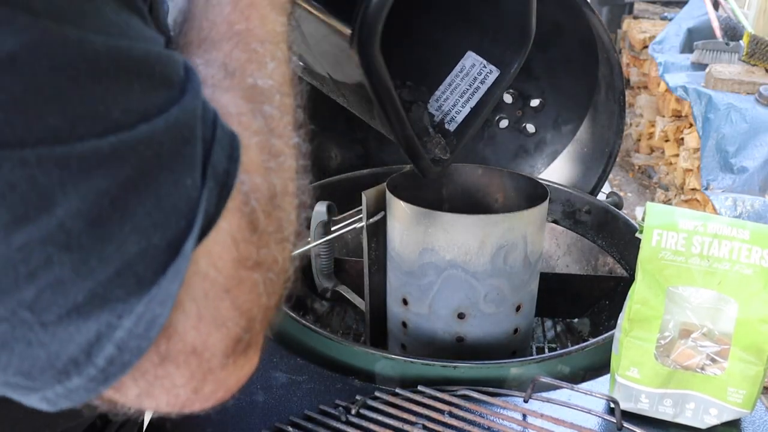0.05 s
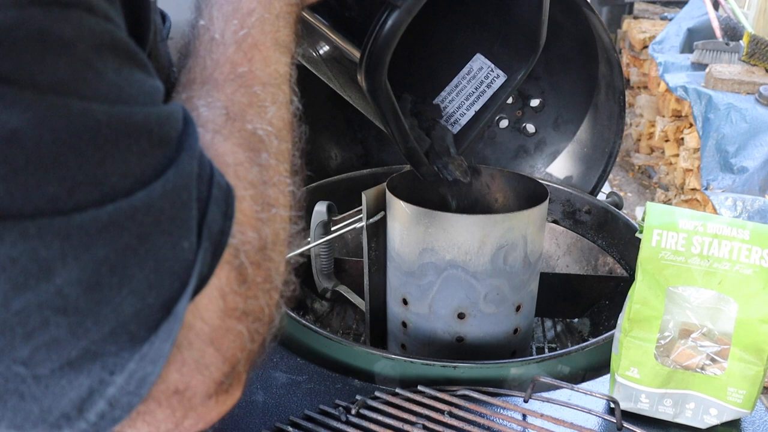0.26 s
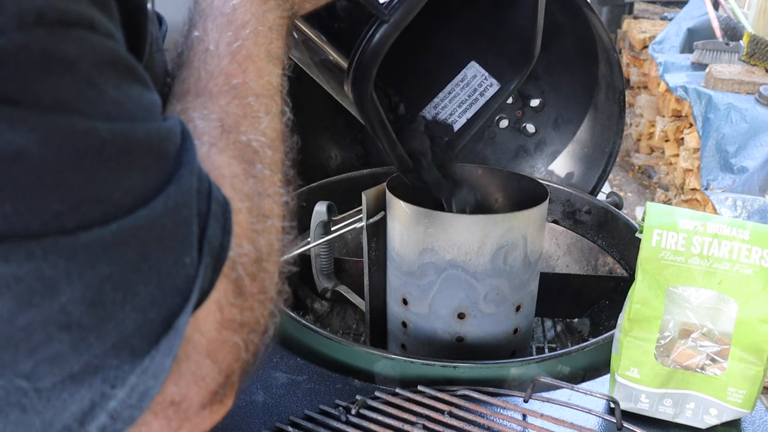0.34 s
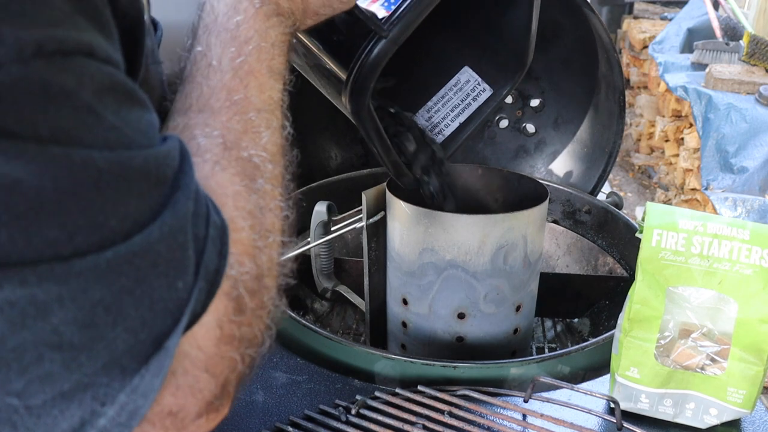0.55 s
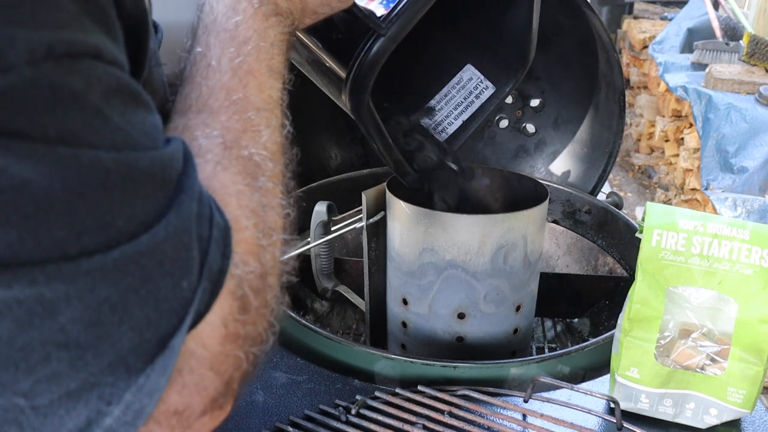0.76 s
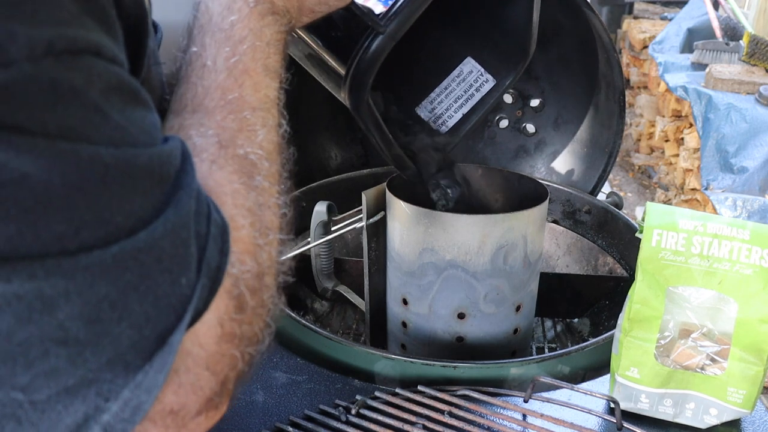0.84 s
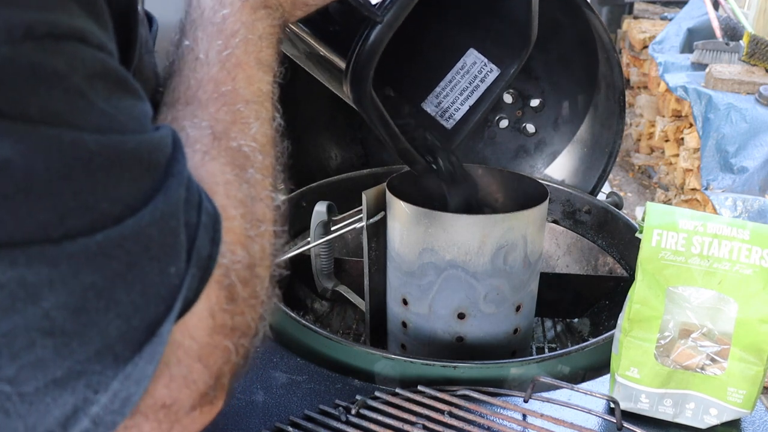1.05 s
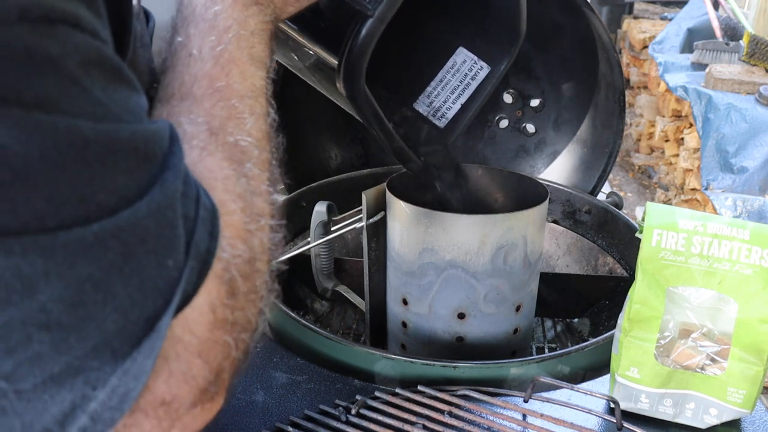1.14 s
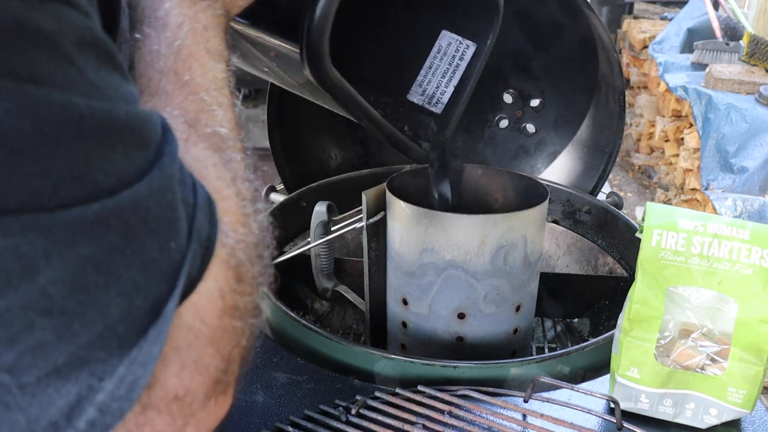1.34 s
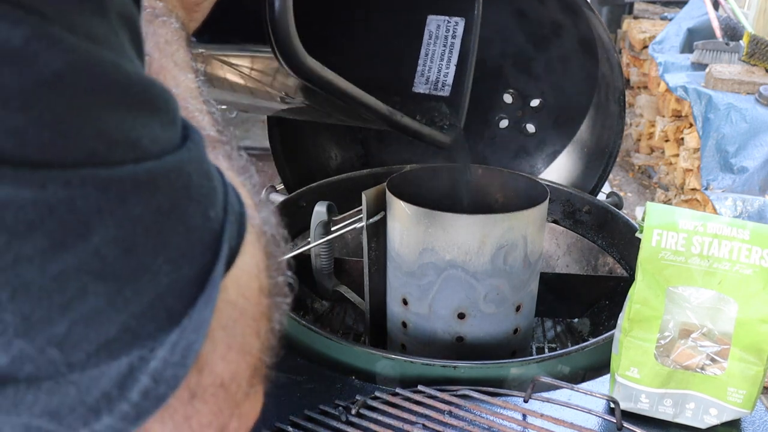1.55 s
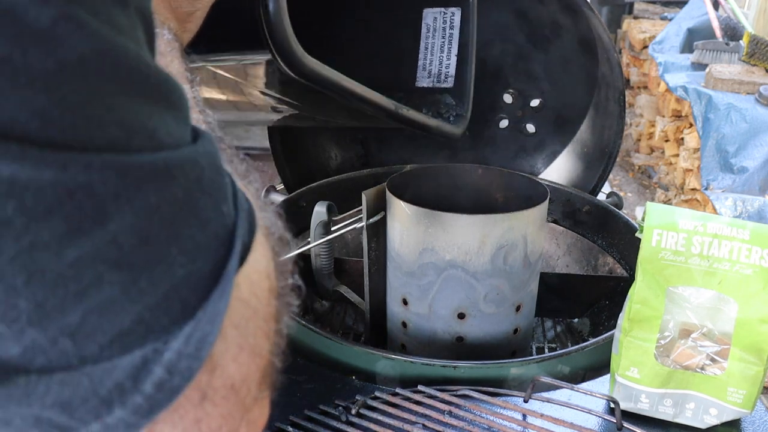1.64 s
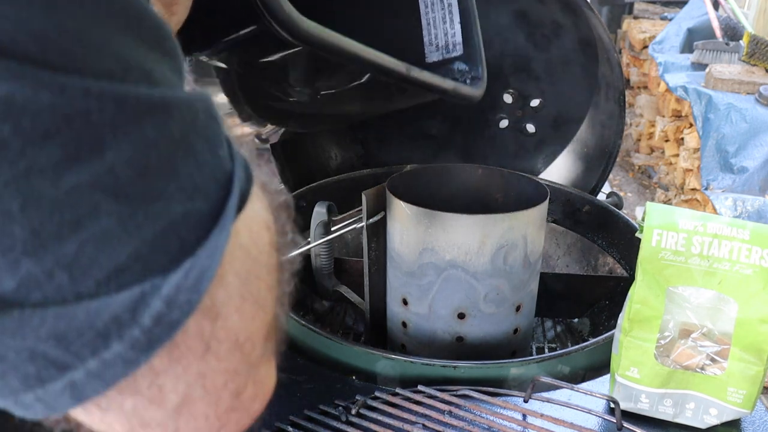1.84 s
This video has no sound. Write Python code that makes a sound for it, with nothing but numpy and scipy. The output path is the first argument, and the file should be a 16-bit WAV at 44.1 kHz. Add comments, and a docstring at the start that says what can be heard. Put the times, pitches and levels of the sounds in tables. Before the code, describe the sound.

Charcoal pours into a metal chimney starter with a rattling, clinking clatter and hollow thumps.

```python
"""Hollow thumps and a swelling clatter: lump charcoal slides out of a plastic tub into a steel
chimney starter standing in an open grill. Each impact excites the damped modes of a brittle lump,
heard as a knock, a clink and a spray of chips. The steel wall resonates in sympathy, and reflections
from its tube and the yard smear each blow. The tub empties and the last pieces settle in quiet air."""
import sys
import numpy as np
from scipy import signal
from scipy.fft import rfft, irfft
from scipy.io import wavfile

SR = 44100
rng = np.random.default_rng(int(sys.argv[2]) if len(sys.argv) > 2 else 0)


def pcm_store(signal):
    """Save signal as 16-bit PCM."""
    levels = np.round(np.clip(np.atleast_2d(signal), -1, 1) * 32767)
    wavfile.write(sys.argv[1], SR, levels.astype(np.int16).T)


N = 83790
RING_S, BLOW_S = .25, .018  # length of a response; nominal duration of a blow
BLOW_GAIN = np.sqrt(2 * BLOW_S * SR)  # gives a unit-energy sound unit power over 2 * BLOW_S

# big lumps landing (time [s], knock pitch [Hz], knock level [dB], clink pitch [Hz],
# clink level [dB], chip level [dB])
LANDINGS = [(0.196, 560, -53, 2940, -48, -73), (0.261, 827, -35, 2930, -35.5, -62),
            (0.352, 697, -22, 2870, -52, -59), (0.393, 872, -22, 3015, -24, -41),
            (0.409, 858, -22.5, 3350, -26, -52), (0.451, 720, -60, 3440, -35, -43),
            (0.5, 980, -31.5, 2820, -29, -45), (0.524, 1150, -32, 3607, -22, -31),
            (0.569, 960, -35.5, 2600, -30, -37), (0.596, 1035, -29.5, 3170, -23, -51),
            (0.614, 1334, -28.5, 2507, -20.5, -35.5), (0.682, 1264, -30.5, 3060, -22.5, -37.5),
            (0.75, 940, -47, 3310, -40, -60), (0.81, 680, -40, 3560, -25, -48),
            (0.826, 934, -37, 3780, -26, -34.5), (0.885, 1220, -31, 3530, -20, -32),
            (0.906, 950, -20, 2890, -27, -49), (0.985, 970, -35, 3073, -23, -38),
            (1.043, 617, -29, 3870, -22, -27), (1.077, 1060, -38, 3350, -28.5, -35.5),
            (1.091, 997, -17.5, 2818, -19.5, -36), (1.098, 1110, -27, 2790, -20, -39.5),
            (1.148, 925, -35.5, 2980, -30.5, -43.5), (1.209, 1150, -38, 3238, -15.5, -39.5),
            (1.274, 1066, -39.5, 3220, -26.5, -56), (1.32, 1600, -42, 3370, -19, -40.5),
            (1.346, 1333, -36, 3090, -22.5, -42), (1.362, 1320, -34.5, 3300, -27.5, -48),
            (1.4, 1580, -38.5, 3636, -19, -40), (1.508, 800, -74, 3320, -37, -49.5),
            (1.521, 1350, -67, 3360, -37, -44.5), (1.541, 1450, -57, 2682, -24, -45),
            (1.571, 1300, -49, 3140, -31.5, -39.5), (1.822, 884, -56.5, 3180, -61, -56)]
def big_lumps():
    """Impact excitation: one blow sets off a lump's knock, clink and chips at once."""
    out = np.zeros(N)
    for s, knock_hz, knock_db, clink_hz, clink_db, chip_db in LANDINGS:
        sounds = lump(knock_hz, clink_hz, grind_s=.013, echo_db=0)
        for sound, db in zip(sounds, (knock_db - 2.5, clink_db - .5, chip_db + 4.5)):
            add(out, s, undb(db) * BLOW_GAIN * sound)
    return out


# spectral envelopes of a middling lump's three sounds (frequency [Hz], relative level [dB])
KNOCK_SPECTRUM = [(100, -72), (250, -6.5), (400, -2), (700, 4.5), (1100, -1), (1600, -2.5), (2400, -18.5),
                  (5000, -41.5), (16000, -61)]
CLINK_SPECTRUM = [(100, -36), (800, -22), (1500, -8), (2200, -4), (2800, -0.5), (3400, 1.5), (4300, -4),
                  (5500, -10), (8000, -22.5), (16000, -44)]
CHIP_SPECTRUM = [(100, -11), (2000, -18), (4000, 6), (5500, -1), (8000, -1.5), (10500, -8), (13000, -10),
                 (16000, -10.5)]
KNOCK_HZ, CLINK_HZ = 912, 3245  # pitches of that lump
def lump(knock_hz, clink_hz, grind_s, echo_db):
    """Frequency scaling: smaller lumps knock and clink higher, while the chips keep one band."""
    knock_tone = colour([(hz * knock_hz / KNOCK_HZ, db) for hz, db in KNOCK_SPECTRUM])
    clink_tone = colour([(hz * clink_hz / CLINK_HZ, db) for hz, db in CLINK_SPECTRUM])
    knock = charcoal_modes(.5 * knock_hz, 2 * knock_hz, t60=.047, count=10)
    clink = charcoal_modes(.6 * clink_hz, 1.6 * clink_hz, t60=.094, count=11)
    chip = charcoal_modes(3973, 15000, t60=.054, count=20)
    return [impact(knock_tone, knock, grind_s, echo_db, ring_db=0),
            impact(clink_tone, clink, grind_s, echo_db, ring_db=-1),
            impact(colour(CHIP_SPECTRUM), chip, grind_s, echo_db, ring_db=-5)]


def charcoal_modes(lo_hz, hi_hz, t60, count):
    """Free vibration: an irregular solid rings at unevenly spaced frequencies."""
    place, size, sign = rng.random((count, 3)).T
    hz = np.minimum(lo_hz + (hi_hz - lo_hz) * (np.arange(count) + place) / count, SR * .45)
    amplitude = size ** 2 * np.sign(sign - .5)
    t = times(.1)
    return (amplitude @ np.sin(2 * np.pi * hz[:, None] * t)) * decay(t, t60)


def impact(tone, modes, grind_s, echo_db, ring_db):
    """Superposition: a crunch of tiny cracks, the tube's and yard's echoes and the lump's ring add up."""
    cracks, tube, yard = rng.standard_normal((3, int(RING_S * SR)))
    cracks = np.sign(cracks) * undb(3 * np.minimum(abs(cracks), 2))  # sizes span 6 dB
    at_rest = np.maximum(times(RING_S) - grind_s, 0)  # the noise holds while the lump grinds on the pile
    noise = unit(cracks * decay(at_rest, t60=.13))
    noise += undb(echo_db - 1.5) * unit(tube * decay(at_rest, t60=.17))
    noise += undb(echo_db - 6) * unit(yard * decay(at_rest, t60=.33))
    out = shaped(noise, tone)
    add(out, 0, undb(ring_db) * shaped(modes, tone))
    return unit(out)


# stream of small pieces (time [s], tub level [dB], knock level [dB], clink level [dB], chip level [dB])
STREAM_LEVELS = [(0, -73, -54, -59.5, -83), (0.188, -41, -47.5, -55.5, -65),
                 (0.248, -20.5, -21.5, -27.5, -39), (0.33, -25, -26, -31.5, -39.5),
                 (0.45, -19.5, -23.5, -25, -34.5), (0.58, -26, -23, -23, -30.5),
                 (0.718, -29.5, -23.5, -17.5, -26.5), (0.82, -27.5, -31, -22, -36),
                 (0.96, -30.5, -34.5, -20.5, -32), (1.13, -33, -26, -23.5, -37.5),
                 (1.25, -42.5, -28, -22.5, -28), (1.382, -44.5, -50, -19, -40.5),
                 (1.49, -43.5, -53, -39.5, -41.5), (1.6, -88, -43.5, -37, -38.5),
                 (1.7, -53.5, -54.5, -41.5, -47.5), (1.799, -93, -52, -51, -50),
                 (1.89, -57, -50.5, -45, -46.5)]
def flow(part, gain_db):
    """Amplitude envelope: one part of the stream swells and ebbs with the pour."""
    s, *levels = np.array(STREAM_LEVELS).T
    db = levels[("tub", "knock", "clink", "chip").index(part)]
    return undb(np.interp(np.arange(N) / SR, s, db) + gain_db)


def stream(count=12):
    """Shot noise: random collisions of small pieces merge into a clatter, with dry ticks of grit."""
    knocks = contacts(per_s=399, count=count) * flow("knock", -5.5)
    clinks = contacts(per_s=382, count=count) * flow("clink", -5.46)
    chips = contacts(per_s=793, count=count) * flow("chip", -7.5)
    grit = contacts(per_s=260, count=count) * flow("chip", -11)
    pitches = 2 ** (.1157 * rng.standard_normal(count))  # spread in octaves
    out, crisp = np.zeros(N), colour(CHIP_SPECTRUM)
    for i, pitch in enumerate(pitches):
        # small pieces collide above the tube and are drier
        sounds = lump(KNOCK_HZ * pitch, CLINK_HZ * pitch, grind_s=0, echo_db=-9.5)
        for touches, sound in zip((knocks, clinks, chips), sounds):
            out += play(touches[i], sound)
        splinter = charcoal_modes(4200, 14620, t60=.009, count=16)
        out += play(grit[i], shaped(splinter, crisp))
    return out


def contacts(per_s, count=1):
    """Random impulse trains: touches of power-law strength, shared among pieces, of unit total power."""
    when, size, who = rng.random((4000, 3))[:int(per_s * N / SR)].T
    strength = undb(-3.2 * np.log(size + .02))
    out = np.zeros((count, N))
    out[(who * count).astype(int), (when * N).astype(int)] = strength * (-1) ** np.arange(len(when))
    return unit(out) * np.sqrt(N)


# single pieces snapping (time [s], level [dB])
FRACTURES = [(0.2647, -33.5), (0.454, -36), (0.892, -31.5)]
def snaps():
    """Brittle fracture: a piece breaks with one short, bright click."""
    out, tone = np.zeros(N), colour(CLINK_SPECTRUM)
    for s, db in FRACTURES:
        click = charcoal_modes(1500, 5740, t60=.0095, count=14)
        add(out, s, undb(db) * BLOW_GAIN * shaped(click, tone))
    return out


# modes of the steel wall (frequency [Hz], relative level [dB])
WALL_MODES = [(1020, -14.5), (1170, -9), (1665, -34), (2272, -8), (2454, 3), (2545, 5.5), (2830, 2.5),
              (2970, 3.5), (3125, 8), (3330, 3.5), (3435, 4.5), (3618, -9), (3880, 2), (4035, 6),
              (4200, -27), (4807, -5)]
def chimney(clatter, wall_db=-13.5, t60=.27):
    """Sympathetic resonance: the steel wall rings along with the pieces that strike it."""
    wall = ring([(hz, db, t60) for hz, db in WALL_MODES], 2 * RING_S)
    return clatter + undb(wall_db) * unit(play(clatter, wall)) * np.linalg.norm(clatter)


# taps that ring the wall: small pieces, and at 1.54 s a big lump's knock (time [s], pitch of the struck spot
# [Hz], level [dB])
WALL_TAPS = [(0.395, 2840, -24), (0.752, 3580, -26.5), (1.215, 3180, -35), (1.276, 3700, -24.5),
             (1.326, 3400, -23.5), (1.405, 4000, -34), (1.541, 1040, -40), (1.542, 1640, -38),
             (1.668, 2670, -43), (1.687, 2830, -55), (1.738, 3030, -46.5)]
def wall_taps(width_octaves=.14, t60=.11):
    """Selective excitation: a tap wakes only the wall's modes near the pitch of that spot."""
    out = np.zeros(N)
    for s, spot_hz, db in WALL_TAPS:
        detunes = 1 + .0076 * rng.standard_normal(len(WALL_MODES))
        modes = [(hz * detune, mode_db - 5.4 * (np.log2(hz / spot_hz) / width_octaves) ** 2, t60)
                 for (hz, mode_db), detune in zip(WALL_MODES, detunes)]
        blow = rng.standard_normal(SR // 100) * decay(times(.01), t60=.026)
        add(out, s, undb(db) * BLOW_GAIN * shaped(blow, ring(modes, RING_S)))
    return out


# modes of the plastic tub (frequency [Hz], relative level [dB], T60 [s])
TUB_MODES = [(167, -2, 0.184), (183, 0, 0.14), (230, -3.5, 0.092), (246, 0, 0.11), (271.7, 3, 0.052),
             (346, -8.5, 0.055), (407, -6, 0.047)]
# lumps tumbling against the tub (time [s], level [dB])
TUB_THUMPS = [(0.148, -45), (0.231, -26.5), (0.269, -31), (0.358, -19.5), (0.38, -13), (0.402, -27),
              (0.43, -25), (0.473, -18.5), (0.522, -26), (0.67, -22), (0.91, -23.5), (1.057, -29),
              (1.09, -30), (1.443, -40), (1.825, -62)]
# deep bumps of the tub as it is tipped (time [s], frequency [Hz], level [dB])
TIPPING_BUMPS = [(0.387, 107, -43), (1.426, 101, -49), (1.752, 112, -52.5), (1.824, 136, -53)]
def tub(bump_t60=.22):
    """Forced vibration: soft pushes of rolling lumps drive the tub's low modes; tipping adds bumps."""
    soft = np.vstack([signal.butter(2, 520, fs=SR, output="sos"),
                      signal.butter(10, 144, "high", fs=SR, output="sos")])
    body = unit(signal.sosfilt(soft, ring(TUB_MODES, RING_S)))
    push = contacts(per_s=219.7)[0] * flow("tub", -3.5)
    for s, db in TUB_THUMPS:
        add(push, s, undb([db - 2.5]) * np.sqrt(BLOW_S * SR))
    out = play(push, body)
    for s, hz, db in TIPPING_BUMPS:
        add(out, s, undb(db) * BLOW_GAIN * ring([(hz, 0, bump_t60)], RING_S))
    return signal.sosfilt(signal.butter(4, 70, "high", fs=SR, output="sos"), out)


# outdoor background (frequency [Hz], relative spectral density [dB])
AIR_SPECTRUM = [(20, -45), (40, -24), (55, 8.5), (80, 2.5), (120, -5.5), (250, 8.5), (1000, -28.5),
                (3500, -18), (7000, -31), (16000, -38)]
def air():
    """Filtered white noise: the faint, steady rumble of the outdoors."""
    return undb(-55) * play(rng.standard_normal(N), colour(AIR_SPECTRUM, size=8192))


def ring(modes, seconds):
    """Modal synthesis: damped sines from rows of (frequency [Hz], level [dB], T60 [s])."""
    t = times(seconds)
    return unit(sum(undb(db) * unit(np.sin(2 * np.pi * hz * t) * decay(t, t60)) for hz, db, t60 in modes))


def colour(points, size=1024):
    """Minimum-phase filter: a folded cepstrum makes (frequency [Hz], level [dB]) points causal."""
    hz, db = np.array(points).T
    bin_hz = np.arange(size // 2 + 1) * SR / size
    gain = undb(np.interp(np.log(bin_hz + 1), np.log(hz), db))
    cepstrum = irfft(np.log(gain))
    cepstrum[1:size // 2] *= 2
    cepstrum[size // 2 + 1:] = 0
    return unit(irfft(np.exp(rfft(cepstrum))))


def play(x, response):
    """Convolution, cut to the length of the scene."""
    return signal.oaconvolve(x, response)[:N]


def shaped(x, response):
    """Convolution, scaled to unit energy."""
    return unit(signal.fftconvolve(x, response))


def decay(t, t60):
    """Exponential damping: 60 dB in t60 seconds."""
    return np.exp(-np.log(1000) * t / t60)


def times(seconds):
    """Uniform sampling instants [s]."""
    return np.arange(int(seconds * SR)) / SR


def undb(db):
    """Decibels to amplitude ratio."""
    return 10 ** (np.asarray(db) / 20)


def unit(x):
    """Normalisation to unit energy."""
    return x / np.sqrt(np.sum(x ** 2) + 1e-18)


def add(out, s, x):
    """Superposition of x, starting at s seconds."""
    i = int(s * SR)
    out[i:i + len(x)] += x[:max(N - i, 0)]


def scene():
    """Linear mixing: charcoal in the chimney, the booming tub and the air sum to one channel."""
    background = air()
    clatter = big_lumps() + stream() + snaps()
    return (chimney(clatter) + wall_taps() + tub() + background)[None]


def record(dry):
    """Band limiting: a steep low-pass cuts the treble above 15.9 kHz."""
    return signal.sosfilt(signal.ellip(10, .2, 80, 15900, fs=SR, output="sos"), dry)


dry = scene()
out = record(dry)
pcm_store(out)
```